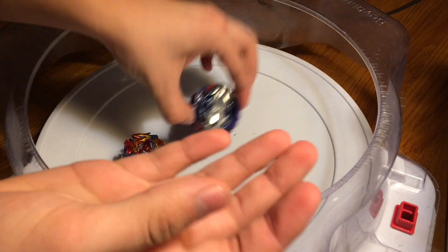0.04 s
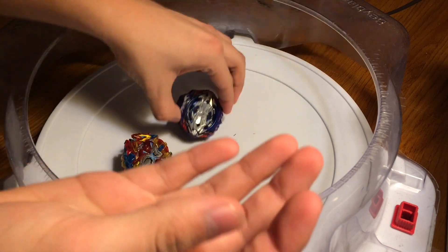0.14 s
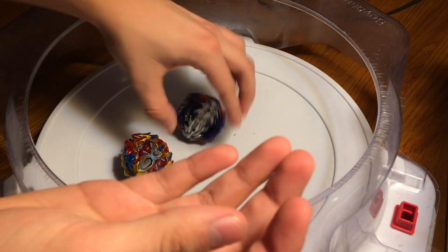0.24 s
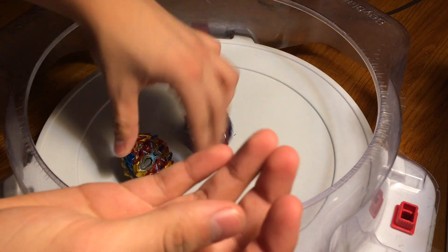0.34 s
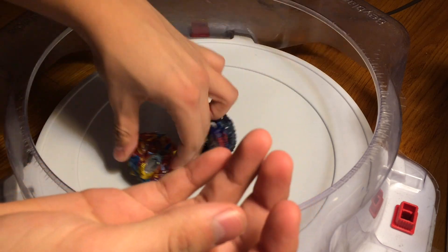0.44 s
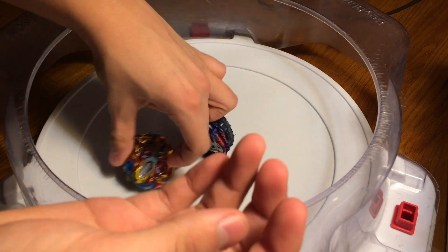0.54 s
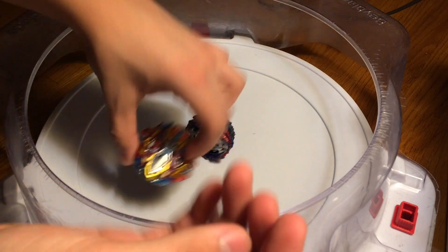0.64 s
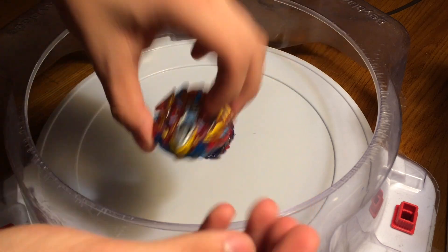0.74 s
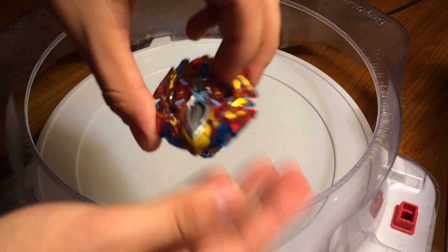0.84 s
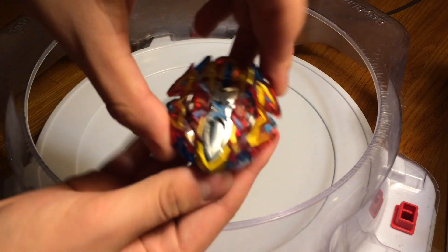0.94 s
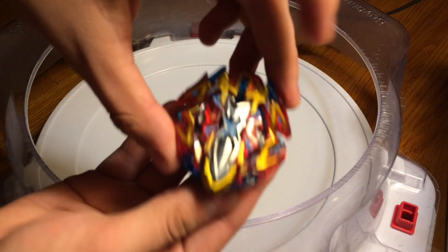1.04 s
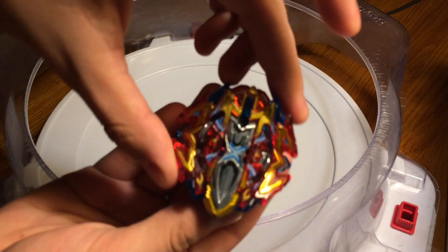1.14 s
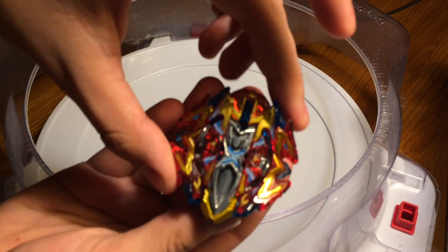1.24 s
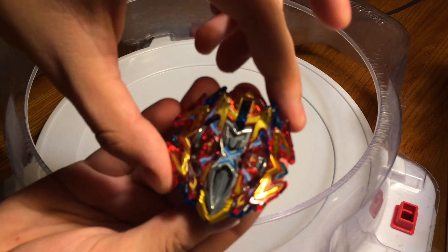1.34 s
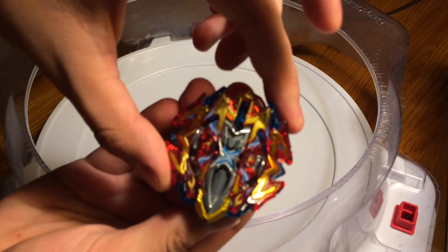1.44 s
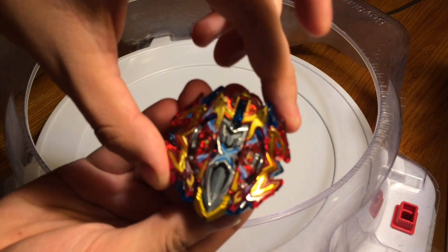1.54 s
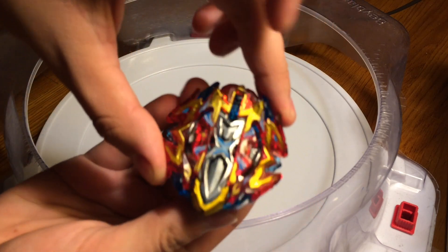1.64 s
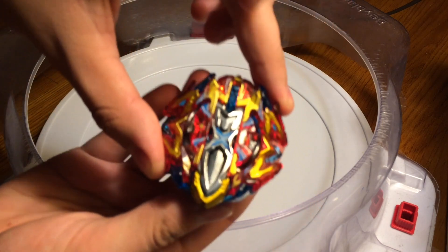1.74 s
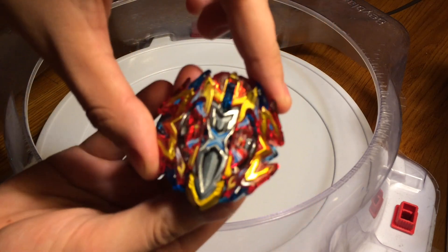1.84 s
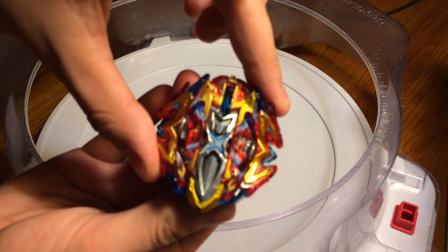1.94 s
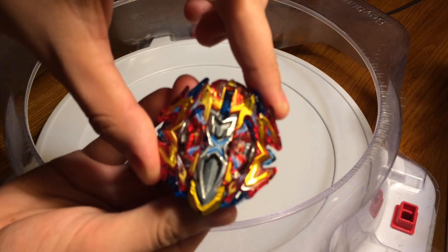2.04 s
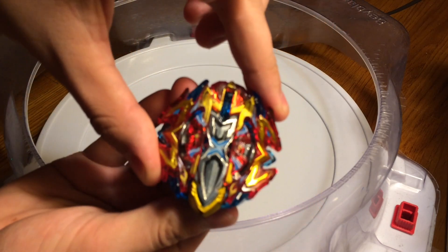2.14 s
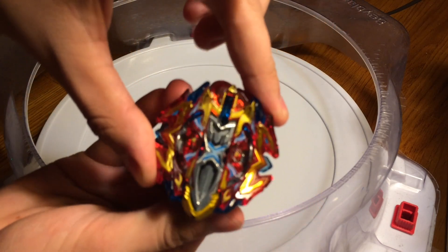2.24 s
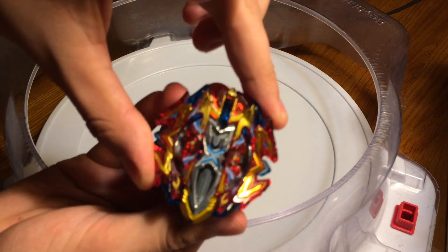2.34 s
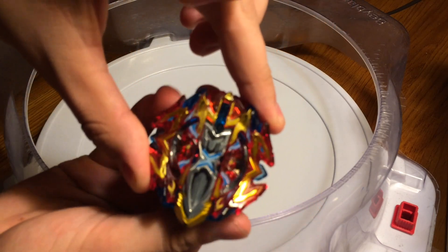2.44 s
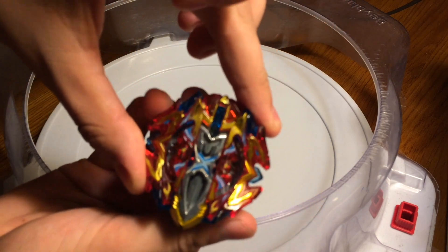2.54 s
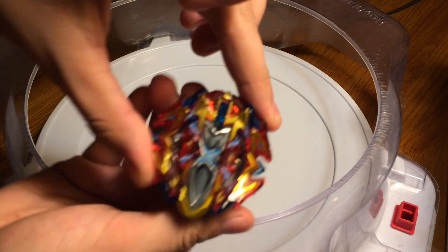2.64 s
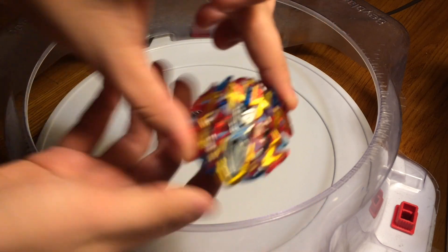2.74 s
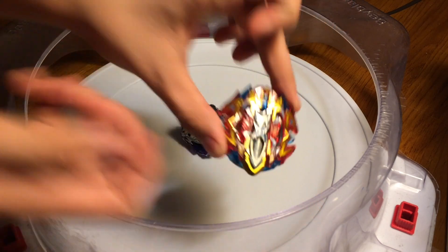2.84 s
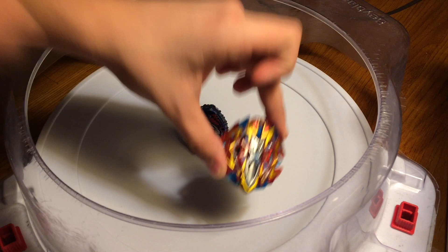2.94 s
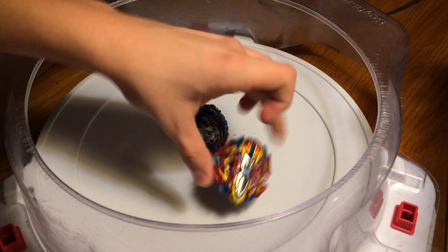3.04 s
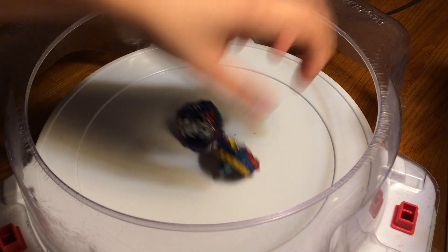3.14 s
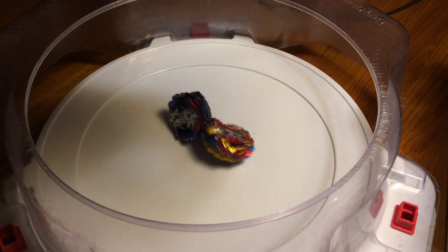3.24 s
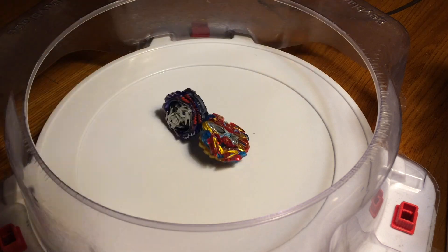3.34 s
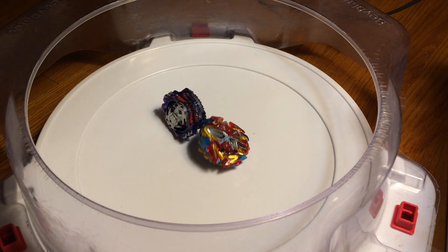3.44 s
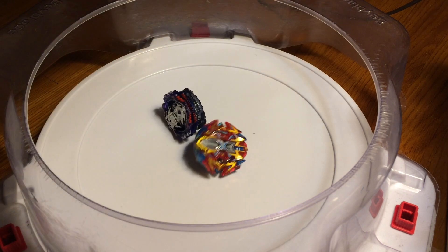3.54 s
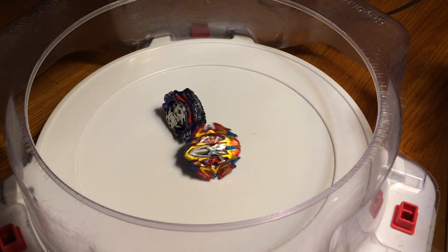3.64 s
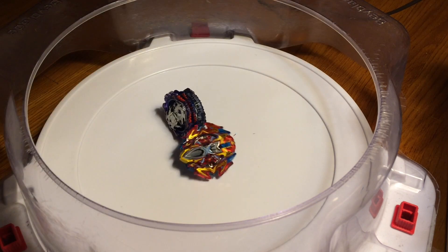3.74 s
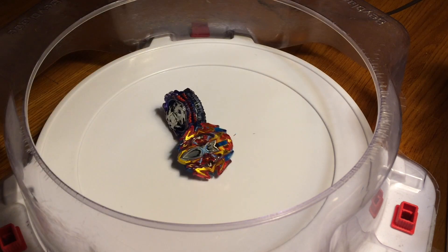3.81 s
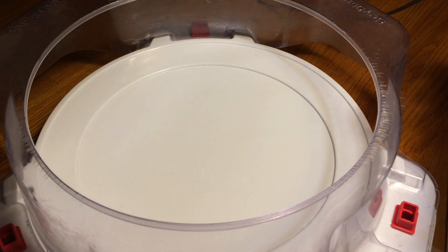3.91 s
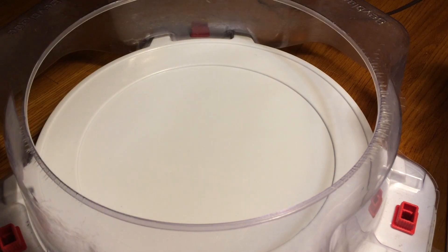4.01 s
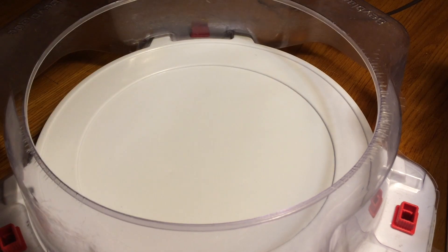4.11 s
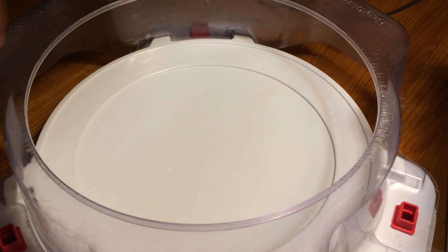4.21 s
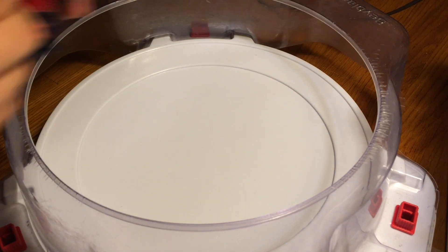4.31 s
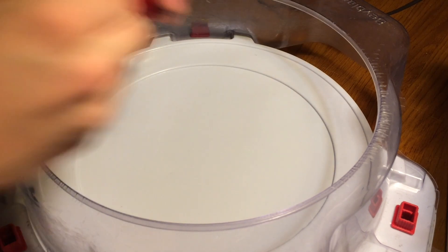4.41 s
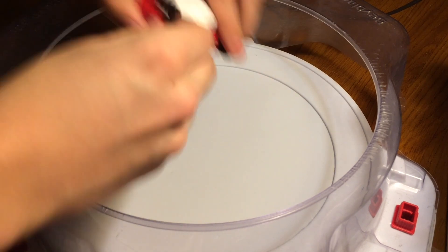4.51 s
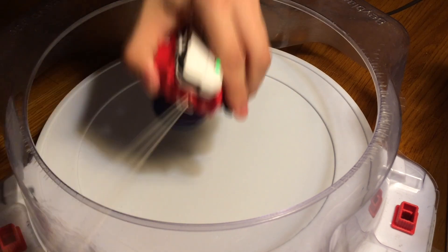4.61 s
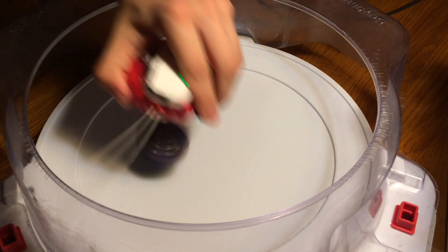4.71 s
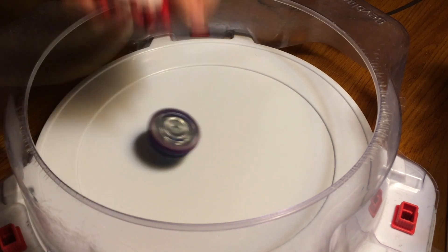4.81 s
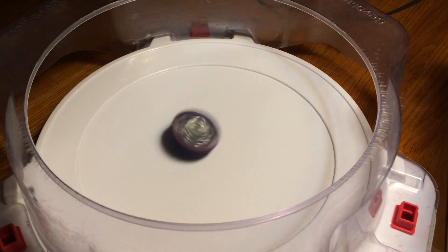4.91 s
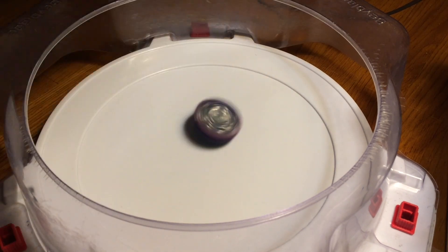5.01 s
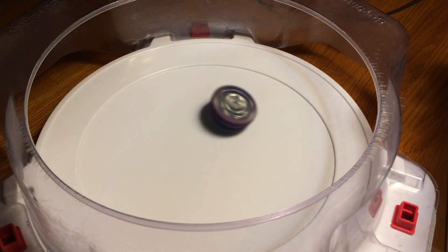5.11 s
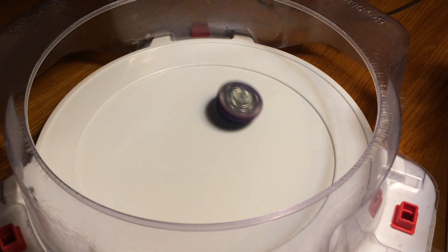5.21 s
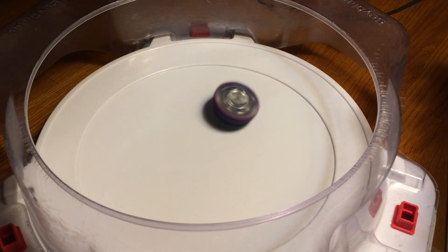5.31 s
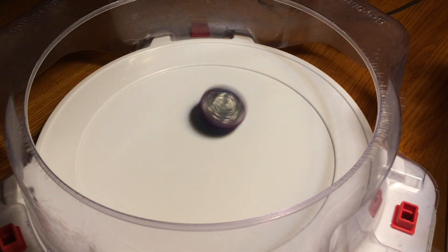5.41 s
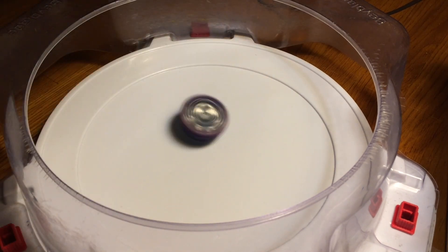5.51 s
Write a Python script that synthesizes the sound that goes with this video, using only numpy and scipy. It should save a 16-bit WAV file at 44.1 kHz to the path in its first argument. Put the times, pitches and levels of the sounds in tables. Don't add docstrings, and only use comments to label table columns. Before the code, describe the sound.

Close handling of plastic and metal toys: a short ringing jingle, knocks and scrapes in a hollow dish, then several crisp, very loud snaps in the hand. The pieces drop back with a boomy clatter and settle. The sound cuts to near quiet, faint rubbing, then a harsh zipping cord pull. A top hits the plastic hard and spins with a bright whirr and quick hopping knocks, in a small lightly reverberant room.

```python
import sys
import numpy as np
from scipy import signal
from scipy.fft import rfft, irfft
from scipy.io import wavfile
from scipy.ndimage import uniform_filter1d

SR = 44100
rng = np.random.default_rng(int(sys.argv[2]) if len(sys.argv) > 2 else 0)


def gain_from_db(level_db):
    decades = np.asarray(level_db, float) / 20
    return 10 ** decades


def wrap_up_sound(samples):
    columns = np.atleast_2d(samples).T
    tamed = np.clip(columns, -1, 1)
    steps = np.round(tamed * 32767).astype(np.int16)
    wavfile.write(sys.argv[1], SR, steps)


N = 245179

# (frequency [Hz], density [dB per Hz])
AIR_SPECTRUM = [(12, -54), (20, -19), (86, -4), (187, -3.5), (241, -12.5), (347, -7.5), (485, -15.5),
                (660, -17.5), (897, -22.5), (1440, -22), (2820, -34), (3530, -29.5), (14300, -36.5),
                (16000, -38)]
# (frequency [Hz], width [Hz], level [dB])
HUM_BANDS = [(92, 14, -63.5), (190, 11, -65)]
# (time [s], peak [dB], pitch [Hz], T60 [s])
RING_EVENTS = [(0.012, -52.5, 3170, 0.32), (.126, -68.5, 3550, 0.07), (0.444, -45.5, 3370, 0.15),
               (0.503, -49, 3400, 0.14), (0.569, -38, 3320, 0.1), (.582, -47, 3305, 0.19),
               (.612, -53.5, 3320, 0.18), (0.649, -58, 3290, .2), (.681, -56, 3290, 0.11),
               (.785, -48, 3320, 0.26), (0.845, -47, 3380, 0.054), (0.959, -54, 3430, 0.13),
               (1.104, -61, 3350, 0.067), (1.17, -74, 3300, 0.054)]
# (ratio to pitch, or to the 3320 Hz body when above 1.1 [1], level [dB], share of T60 [1])
RING_MODES = [(1.001, -1, 0.73), (1.021, -2, 0.74), (1.044, -3, 0.4), (1.247, -8.5, 0.3),
              (1.555, -15, 0.38), (1.98, -6.5, 0.19), (3.9, -27, 0.25)]
# (time [s], peak
# [dB], hollow re snap [dB], brightest [Hz])
CLICKS = [(0.013, -36, -15, 6700), (0.5045, -22, -12, 3800), (0.5553, -29.5, -6, 5350),
          (0.8286, -28.5, -14, 3500), (0.852, -32.5, -29, 7250), (0.9454, -21.5, -14.5, 7170),
          (1.038, -31.5, -11.5, 5130), (1.0962, -38, -15, 7240), (1.1683, -56, 2.5, 3500),
          (1.2225, -40.5, -4, 6700), (1.4605, -55.5, -12, 4110), (1.4704, -47, -13, 4020),
          (1.729, -55, -2, 6200), (1.7446, -36, -15, 6880), (1.773, -52, -12, 5130),
          (1.885, -37.5, -15, 5850), (1.91, -34, -7.5, 7330),
          (2.3056, -15.5, -23, 6840), (2.3132, -13, -18, 6430), (2.3212, -0.5, -20, 7500),
         (2.422, -38.5, -5.5, 6170), (2.436, -21, -21, 6070), (2.4989, -26, -19, 8430),
         (2.5045, -0.5, -22, 6840), (2.588, -16.5, -14.5, 7160), (2.597, -18, -27, 6150),
         (2.6052, -13.5, -23, 8510), (2.6165, -1, -21.5, 7100), (2.763, -36.5, -16, 5900),
         (3.1203, -46.5, -22, 5260), (3.2143, -3, -17.5, 3330), (3.5002, -47, -19, 3530),
         (3.5365, -57.5, -10, 6500), (3.943, -37.5, -8.5, 6900), (4.436, -26.5, 2.5, 3330),
         (4.5535, -29.5, -2.5, 5040), (4.58, -26.5, -6.5, 8300), (5.3519, -15.5, -3.5, 5270),
         (5.4696, -14, -5, 4500)]
# (frequency [Hz], density [dB per Hz])
SNAP_SPECTRUM = [(240, -62), (400, -41.5), (921, -22), (1110, -16.5), (1730, -18.5), (2250, -8),
                 (3210, -14), (4800, -6.5), (5780, -6), (6850, -1.5), (11900, -11.5), (13700, -9),
                 (16000, -23)]
# (frequency [Hz], density [dB per Hz])
TAIL_SPECTRUM = [(240, -57), (400, -34), (504, -25.5), (839, -34), (1490, -19), (2360, -3), (3260, -19),
                 (4650, -4), (7170, 0.5), (13700, -14.5), (16000, -19.5)]
# (time [s], crack peak [dB], boom re crack [dB], sizzle re crack
# [dB], boom [Hz])
KNOCKS = [(0.187, -47.5, -13, -11, 211), (0.209, -11, -6, -6.5, 294), (0.32, -14.5, 2.5, -7.5, 380),
          (0.375, -26.5, 4, -43, 263), (0.393, -27.5, 4, -22, 380), (0.409, -26, 0, -13.5, 375),
          (0.424, -27, -7, -28, 350), (0.498, -31.5, -20, -19, 299), (0.568, -27.5, -10, -10, 320),
          (0.637, -43, 2.5, -6, 324), (0.679, -45.5, 0.5, -26, 407), (0.769, -26, -6.5, -18, 185),
          (0.784, -37, 6.5, -31, 310), (0.955, -40.5, -8.5, -28, 162), (1.071, -42, -14, -20, 174),
          (2.858, -31, -0.5, -20, 593), (2.874, -47.5, 8, -32.5, 400), (2.905, -53, 5, -20, 495),
         (3.172, -16.5, 8, -1.5, 202), (3.185, -16.5, 9, -3, 481), (3.234, -20.5, 9, 2.5, 217),
         (3.34, -18.5, 1.5, -3, 217), (3.381, -26.5, -12, -10.5, 380), (3.546, -42.5, -5, -23, 188),
         (3.599, -32, -5, -14.5, 314), (3.613, -50, 11, 0.5, 310), (3.663, -38.5, -3.5, -28, 168),
         (3.725, -35, -1, -6.5, 180), (3.732, -35.5, 0.5, -27, 335), (3.86, -50.5, -16, -12, 151),
         (3.885, -47, -5.5, -26.5, 192), (3.924, -53, 3, -28, 500)]
# (time [s], crack peak [dB], boom re crack [dB], sizzle re crack [dB], boom [Hz])
LANDING = [
    (4.78, -9, -6.5, 2.5, 590),
    (4.793, -7.5, -10.5, -7, 190),
    (4.839, -8, 2, -27, 930),
    (4.846, -14, 0.5, -27, 706),
    (4.853, -13.5, 3, -18, 600),
    (4.888, -21.5, 2.5, -22, 420),
]
# (time [s], crack peak [dB], boom re crack [dB], boom [Hz])
HOPS = [
    (4.976, -10.5, -3, 380),
    (5.026, -15, 0, 300),
    (5.087, -14.5, 0, 473),
    (5.124, -15.5, 0, 434),
    (5.17, -9, 1, 640),
    (5.245, -8, -0.5, 600),
    (5.315, -7.5, 0, 528),
    (5.393, -6, -6, 355),
    (5.429, -10, -3.5, 417),
    (5.502, -19.5, 4, 408),
]
# (frequency [Hz], density [dB per Hz])
CRACK_SPECTRUM = [(350, -19.5), (600, -3), (1230, -6.5), (1680, -3.5), (2270, -9.5), (3040, -8.5),
                  (5050, -13.5), (8990, -14), (9760, -16), (12800, -15.5), (16000, -25.5)]
# (frequency [Hz], level [dB], T60 [s])
BOWL_MODES = [(168, -7.5, 0.46), (219.9, 2.5, .07), (310, 1.5, 0.21), (389, 6, 0.055), (450.2, -1, 0.17),
              (505, 2, 0.22), (583.6, 4, 0.032), (655, 5, 0.06), (784, -1.5, .06), (850, 4.5, 0.16),
              (950, -3, 0.055), (1110, -6, .05)]
# (time [s], peak [dB], frequency [Hz], T60 [s])
DISH = [(.208, -18, 380, 0.12), (.319, -17, 371, 0.066), (3.174, -15.5, 385, 0.085),
        (3.186, -19.5, 449.5, .06), (4.78, -16, 634, 0.033), (4.838, -15, 926, 0.043),
        (4.843, -10, 670, 0.057), (4.849, -13, 490, .05), (4.976, -22, 387, 0.11), (5.17, -17, 643, .06),
        (5.172, -22, 1015, .05), (5.244, -16, 678, 0.095), (5.246, -19, 950, .04), (5.316, -16, 696, 0.074),
        (5.43, -19, 424, .07)]
# (time [s], peak [dB], frequency [Hz], T60 [s])
THUMPS = [(.5, -33, 79, 0.11), (0.77, -44, 76, 0.11), (2.322, -22.5, 508, 0.016), (2.443, -53, 502, .015),
          (2.61, -29, 1240, .02), (2.619, -39.5, 455, .016), (4.21, -62, 1903, .02),
          (4.328, -61.5, 2020, .02), (4.38, -61, 1280, 0.044), (4.439, -36, 1352, .05),
          (2.855, -43.5, 71.6, 0.2), (3.168, -12, 70, 0.064), (3.339, -33, 70.5, 0.094),
          (3.6, -38.5, 70.4, 0.16), (4.79, -2.5, 81, 0.063)]
# (time [s], peak [dB], frequency [Hz])
RATTLES = [
    (0.2108, -2, 1546),
    (0.258, -24, 1450),
    (0.3753, -23, 1630),
    (0.397, -13, 1200),
    (0.412, -25, 4120),
    (0.426, -28, 1250),
           (3.1735, -5, 1040),
    (3.2153, -5, 5920),
    (3.342, -15.5, 1080),
    (3.3802, -20.5, 1430),
]
# (time [s], peak [dB], frequency [Hz])
FLECKS = [(4.9756, -15, 3700), (5.0235, -19, 2540), (5.0855, -15, 3120), (5.1712, -8, 2511),
          (5.245, -14, 2900), (5.3173, -17, 2970), (5.3532, -11, 5150), (5.3966, -9, 2980),
          (5.4283, -12, 4000), (5.47, -12, 3420), (5.4986, -17, 2710)]
# (start [s], length [s], start level [dB], end level [dB], rumble re scrape [dB])
ROLLS = [(0.226, 0.13, -29, -42, -14.5), (0.331, 0.25, -31.5, -44.5, 5), (0.556, 0.21, -50, -60, 5.5),
         (0.777, 0.035, -22, -60, -4), (0.824, 0.076, -31, -83, 4.5), (0.962, 0.058, -34, -78.5, -3.5),
         (2.872, 0.099, -44.5, -70.5, 7.5), (3.111, 0.06, -71, -45.5, 7.5), (3.19, 0.15, -18, -35.5, 0.5),
         (3.356, 0.12, -27.5, -73, 13), (3.476, 0.17, -67.5, -59.5, 14), (3.597, 0.091, -67.5, -83, 3.5),
         (3.735, 0.083, -57, -79, 13), (3.852, 0.11, -87, -58.5, 14.5)]
# (frequency [Hz], density [dB per Hz])
ROLL_SPECTRUM = [(350, -32.5), (600, -11.5), (984, -2.5), (1260, -2.5), (1470, -4.5), (1610, 0), (2150, -7),
                 (2540, -4.5), (9490, -13.5), (14900, -22.5), (16000, -33.5)]
# (time [s], level [dB])
HANDLING = [
    (4.05, -84),
    (4.2, -64),
    (4.43, -61),
    (4.445, -49),
    (4.47, -49.5),
    (4.54, -49),
    (4.56, -39),
    (4.6, -47),
    (4.66, -36.5),
]
# (frequency [Hz], width [Hz], level [dB])
SHELL_MODES = [(1296, 122, 5), (2330, 1140, 4.5), (3500, 530, -10.5)]
# (time [s], level [dB])
PULL = [
    (4.62, -54),
    (4.642, -61),
    (4.655, -31),
    (4.672, -18.5),
    (4.684, -11),
    (4.72, -9.5),
    (4.8, -11),
    (4.846, -13.5),
    (4.88, -38),
]
# (frequency [Hz], density [dB per Hz])
RASP_SPECTRUM = [(180, -70.5), (300, -20), (900, -6), (1190, -1), (1320, 0), (1430, -5), (2480, -2),
                 (2740, -5), (3640, -5), (4230, -5.5), (4750, -4.5), (9880, -8), (16000, -20)]
# (time [s], tooth rate [Hz], level re rasp [dB])
WHINE = [
    (4.62, 250, -12),
    (4.66, 400, -8),
    (4.685, 630, -7),
    (4.715, 1190, -3),
    (4.74, 1620, -5),
    (4.765, 2000, -6),
    (4.78, 2200, -16),
    (4.88, 2400, -25),
]
TEETH = [1, .55, .65, .4, .35]
# (time [s], level [dB])
SPIN = [
    (4.84, -7),
    (4.9, -23),
    (4.96, -26),
    (5.05, -23.5),
    (5.15, -18),
    (5.3, -22),
    (5.4, -27),
    (5.521, -27.5),
    (5.56, -43),
]
# (frequency [Hz], T60 [s])
ROOM_T60 = [(150, 0.23), (600, 0.33), (2400, 0.3), (6000, 0.28), (14000, 0.26)]
# (time [s], gain [dB])
SCENE_FADE = [
    (0, -2.5),
    (3.955, -1.5),
    (3.98, -15),
    (3.991, -30),
    (4.002, -11),
    (4.024, -4.5),
    (5.6, 1),
]

KNOCK_T60_S, HOP_T60_S = 0.046, 0.036
HARD_DB, HARD_RISE_S, SOFT_RISE_S = -27, 0.00086, 0.0037
HOP_SIZZLE_DB, BRIGHTEN_DB_PER_DB = -2.5, 0.86
REBOUND_S, REBOUND_DB, REBOUND_SIZZLE_DB, REBOUND_PITCH_RATIO = 0.005, -3.5, -1.5, 0.66
CLICK_T60_CYCLES = 142
RING_BODY_HZ = 3320
ROLL_SIZZLE_DB = -8
SETTLE_S, SPIN_RUMBLE_DB, SPIN_SIZZLE_DB = 0.026, -15, 0
LAND_RUMBLE_DB, LAND_SIZZLE_DB = 16, -6.5


def seconds(size):
    return np.arange(size) / SR


def evened(x):
    return x / np.sqrt(np.mean(x ** 2) + 1e-20)


def wander(shape, smooth_samples):
    return evened(uniform_filter1d(rng.standard_normal(shape), smooth_samples))


def read(points, hz):
    f, value = np.transpose(points)
    return np.interp(np.log(hz + 1), np.log(f + 1), value)


def split(hz, edge_hz):
    return -10 * np.log10(1 + (hz / edge_hz) ** 8)


def add(mix, s, sound):
    part = mix[round(s * SR):][:len(sound)]
    part += sound[:len(part)]


def noise(size, gain_db):
    hz = np.fft.rfftfreq(size, 1 / SR)
    return evened(irfft(rfft(rng.standard_normal(size)) * gain_from_db(gain_db(hz)), size))


def resonate(x, hz, width_hz):
    turn = np.exp(2j * np.pi * np.cumsum(hz * np.ones(len(x))) / SR)
    r = np.exp(-np.pi * width_hz / SR)
    return 2 * (turn * signal.lfilter([1 - r], [1, -r], x / turn + 1e-18)).real


def burst(t60_s, rise_s):
    t = seconds(4096)
    return (1 - np.exp(-t / rise_s)) * gain_from_db(-60 * t / np.clip(t60_s, 0.004, 0.3))


def controls(rows):
    s, *columns = np.transpose(rows)
    t = np.arange(s[0], s[-1], 1 / SR)
    return s[0], signal.windows.tukey(len(t), 0.05), *(np.interp(t, s, c) for c in columns)


def air():
    out = gain_from_db(-61.5) * noise(N, lambda hz: read(AIR_SPECTRUM, hz))
    for hz, width_hz, db in HUM_BANDS:
        out += gain_from_db(db) * evened(resonate(rng.standard_normal(N), hz, width_hz))
    return out


def ring(db, pitch_hz, t60_s):
    t = seconds(16384)
    modes = np.zeros(len(t))
    for ratio, mode_db, share in RING_MODES:
        hz = ratio * (pitch_hz if ratio < 1.1 else RING_BODY_HZ)
        modes += gain_from_db(mode_db - 60 * t / (share * t60_s)) * np.sin(2 * np.pi * (hz * t + rng.random()))
    flutter = 2.4 + abs(wander(len(t), 150))
    return gain_from_db(db) * modes * flutter * (1 - np.exp(-t / 0.00037))


def click(db, hollow_db, peak_hz, t60_s):
    t = seconds(16384)
    tick = np.sin(2 * np.pi * peak_hz * t) * np.exp(-((t - 0.0008) / 0.00076) ** 2)
    bright = noise(4096, lambda hz: read(SNAP_SPECTRUM, hz) + split(4100, hz + 1))
    hollow = noise(4096, lambda hz: read(SNAP_SPECTRUM, hz) + split(hz, 3000))
    tail = noise(len(t), lambda hz: read(TAIL_SPECTRUM, hz))
    tail *= gain_from_db(-60 * t / 0.28) * (1 - np.exp(-t / 0.0026))
    cavity = evened(resonate(resonate(rng.standard_normal(len(t)), 2300, 500), 2300, 500))
    cavity *= gain_from_db(-60 * t / 0.4) * (1 - np.exp(-t / 0.0017))
    out = 1.2 * tick + gain_from_db(-21.5) * tail + gain_from_db(-44.5) * cavity
    add(out, 0, 1.06 * bright * burst(t60_s, 0.00054))
    add(out, 0, gain_from_db(hollow_db + 5.0) * hollow * burst(2.04 * t60_s, 0.00077))
    return gain_from_db(db - 6.5) * out


def bowl(force, hit_hz):
    t = seconds(8192)
    modes = np.zeros(len(t))
    for hz, db, t60_s in BOWL_MODES:
        nearness = 1 / (1 + (np.log(hz / hit_hz) / 0.36) ** 2)
        modes += gain_from_db(db - 60 * t / t60_s) * np.sin(2 * np.pi * hz * t) * nearness
    rung = signal.oaconvolve(force, modes / np.linalg.norm(modes))[:len(force)]
    return signal.sosfilt(signal.butter(4, 135, "high", fs=SR, output="sos"), rung)


def knock(db, boom_db, sizzle_db, boom_hz, t60_s, rise_s):
    dull_hz = 3600 * gain_from_db(0.15 * (db + 14))
    crack = noise(4096, lambda hz: read(CRACK_SPECTRUM, hz) + split(hz, dull_hz))
    sizzle = noise(4096, lambda hz: read(CRACK_SPECTRUM, hz) + split(4800, hz + 1))
    blow = seconds(4096) * boom_hz * 9.7
    push = 4.0 * blow * np.exp(-blow) + rng.standard_normal(4096) * burst(0.77 * t60_s, rise_s)
    boom = bowl(push, boom_hz) * burst(1.6 * t60_s, 0.0001)
    stutter = gain_from_db(3.3 * wander(4096, 50))
    sharp = (crack + gain_from_db(sizzle_db + 4.0) * sizzle) * burst(t60_s, rise_s) * stutter
    return gain_from_db(db + 1.0) * (sharp + gain_from_db(boom_db + 4.0) * boom / abs(boom).max())


def thump(db, hz, t60_s):
    return gain_from_db(db) * np.sin(2 * np.pi * hz * seconds(4096)) * burst(t60_s, min(0.006, 1.4 / hz))


def rattle(db, hz):
    ping = np.sin(2 * np.pi * hz * seconds(4096)) * burst(0.024, 0.0003)
    puff = noise(4096, lambda f: read(CRACK_SPECTRUM, f) + split(1200, f + 1)) * burst(0.01, 0.00027)
    return gain_from_db(db - 5.5) * (ping + 0.37 * puff)


def roll(rows, steady):
    s, ends, db, rumble_db, sizzle_db = controls(rows)
    size = len(db)
    strength = gain_from_db(3.0 * np.minimum(rng.exponential(1, size), 4))
    impacts = strength * (rng.random(size) < 220 / SR)
    bumps = steady + evened(signal.lfilter([1], [1, -np.exp(-1 / (0.004 * SR))], impacts))
    low = noise(size, lambda hz: read(ROLL_SPECTRUM, hz) + split(700, hz + 1) + split(hz, 3300))
    high = noise(size, lambda hz: read(ROLL_SPECTRUM, hz) + split(3700, hz + 1))
    rumble = evened(bowl(bumps * rng.standard_normal(size), 340))
    scrape = evened(bumps) * (low + gain_from_db(sizzle_db) * high)
    return s, ends * gain_from_db(db - 8.5) * (scrape + gain_from_db(rumble_db) * rumble)


def slide(s, length_s, start_db, end_db, rumble_db):
    rows = [(s, start_db, rumble_db, ROLL_SIZZLE_DB), (s + length_s, end_db, rumble_db, ROLL_SIZZLE_DB)]
    return roll(rows, steady=0.3)


def handling():
    s, ends, db = controls(HANDLING)
    rub = rng.standard_normal(len(db)) * gain_from_db(2.0 * wander(len(db), 500))
    shell = np.zeros(len(db))
    for hz, width_hz, mode_db in SHELL_MODES:
        firm_db = 0.3 * (db + 49.5) * np.log(hz / 1300)
        shell += gain_from_db(mode_db + firm_db) * evened(resonate(rub, hz, width_hz))
    return s, ends * gain_from_db(db) * shell / 3.2


def launcher():
    s, ends, db = controls(PULL)
    when_s, rate_hz, whine_db = np.transpose(WHINE)
    size = len(db)
    t = s + seconds(size)
    wobble = 1 + 0.04 * wander(size, 200)
    turns = np.cumsum(np.interp(t, when_s, rate_hz) * wobble) / SR
    slip = abs(wander((len(TEETH), size), 400)) ** np.sqrt(np.arange(len(TEETH)))[:, None]
    teeth = np.zeros(size)
    for k, share in enumerate(TEETH, 1):
        teeth += np.cos(2 * np.pi * k * turns + k * k) * share * slip[k - 1]
    teeth *= 1.5 + wander(size, 130)
    hz = np.fft.rfftfreq(size, 1 / SR)
    case_db = read(RASP_SPECTRUM, hz) + 2 * split(1080, hz + 1) + split(hz, 4200)
    case_db += 5 / (1 + ((hz - 1900) / 150) ** 2) + 7 / (1 + ((hz - 3650) / 250) ** 2)
    whine = evened(irfft(rfft(teeth) * gain_from_db(case_db), size))
    grit = gain_from_db(1.75 * wander(size, 90))
    rasp = evened(grit * noise(size, lambda f: read(RASP_SPECTRUM, f) + split(1340, f + 1)))
    whine_gain = gain_from_db(np.interp(t, when_s, whine_db) + 2.6)
    return s, ends * gain_from_db(db - 0.67) * (rasp + whine_gain * whine)


def spin():
    s, db = np.transpose(SPIN)
    landing = np.exp(-(s - s[0]) / SETTLE_S)
    rumble_db = SPIN_RUMBLE_DB + LAND_RUMBLE_DB * landing
    sizzle_db = SPIN_SIZZLE_DB + LAND_SIZZLE_DB * landing ** 2
    return roll(np.transpose([s, db, rumble_db, sizzle_db]), steady=1.6)


def hop(s, db, boom_db, hz):
    bright_db = BRIGHTEN_DB_PER_DB * db
    first = knock(db, boom_db, HOP_SIZZLE_DB + bright_db, hz, HOP_T60_S, SOFT_RISE_S)
    second = knock(db + REBOUND_DB, boom_db, REBOUND_SIZZLE_DB + bright_db, hz * REBOUND_PITCH_RATIO,
                   HOP_T60_S, SOFT_RISE_S)
    return (s, first), (s + REBOUND_S, second)


def room(x):
    out = np.zeros(N)
    turn = 2 * np.pi * 4.3 * seconds(N)
    for k in range(3):
        taps = np.zeros(SR // 2)
        at = np.arange(200, len(taps) - 20, 20)
        taps[at + rng.integers(0, 20, len(at))] = rng.choice([-1., 1.], len(at))
        hz, t, z = signal.stft(taps, SR, nperseg=256)
        decay = gain_from_db(-60 * t / read(ROOM_T60, hz)[:, None])
        tail = signal.istft(z * decay, SR, nperseg=256)[1]
        share = np.sqrt(2 / 3) * np.cos(turn + k * 2 * np.pi / 3)
        out += signal.fftconvolve(x * share, tail / np.linalg.norm(tail))[:N]
    return out


def scene():
    floor, hops, hand, parts = np.zeros((4, N))
    for s, *row in RING_EVENTS:
        add(parts, s, ring(*row))
    for s, db, hollow_db, hz in CLICKS:
        add(parts, s + 0.00069, click(db, hollow_db, hz, CLICK_T60_CYCLES / hz))
    for s, db, *row in KNOCKS:
        rise_s = HARD_RISE_S if db > HARD_DB else SOFT_RISE_S
        add(floor, s, knock(db, *row, KNOCK_T60_S, rise_s))
    for s, *row in THUMPS + DISH:
        add(floor, s, thump(*row))
    for s, *row in RATTLES + FLECKS:
        add(floor, s, rattle(*row))
    for row in ROLLS:
        add(floor, *slide(*row))
    add(hand, *handling())
    add(hand, *launcher())
    for s, *row in LANDING:
        add(hops, s, knock(*row, HOP_T60_S, SOFT_RISE_S))
    add(floor, *spin())
    for row in HOPS:
        for s, touch in hop(*row):
            add(hops, s, touch)
    wet = room(gain_from_db(-8.5) * floor + gain_from_db(-9) * hops + gain_from_db(-17.0) * hand)
    return (floor + hops + hand + parts + wet + air())[None]


def roll_off(x):
    return signal.sosfilt(signal.butter(12, 16840, fs=SR, output="sos"), x)


def record(dry):
    s, db = np.transpose(SCENE_FADE)
    faded = dry * gain_from_db(np.interp(seconds(N), s, db))
    limited = np.clip(faded, -0.93, 0.93)
    low_pass = signal.firwin(511, 15950, window=("kaiser", 9), fs=SR)
    mix = signal.oaconvolve(limited, low_pass[None], "same")
    return roll_off(mix)


dry = scene()
out = record(dry)
wrap_up_sound(out)
```